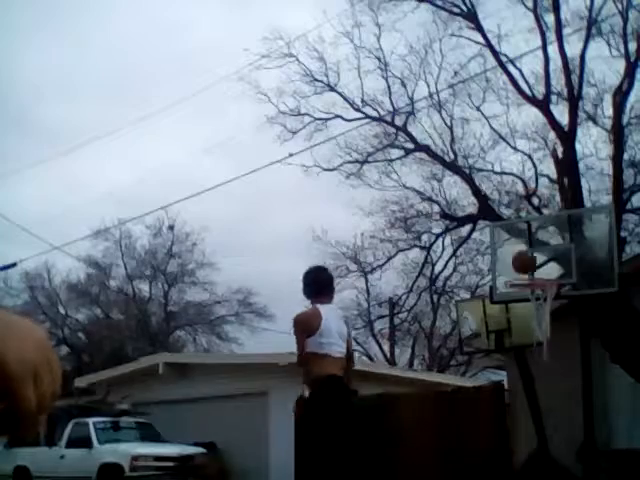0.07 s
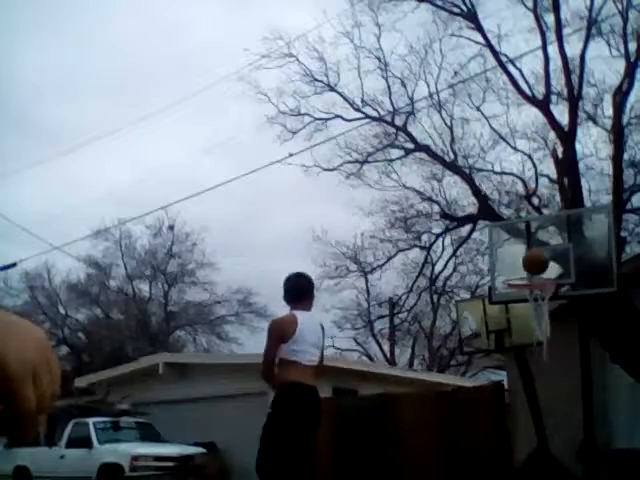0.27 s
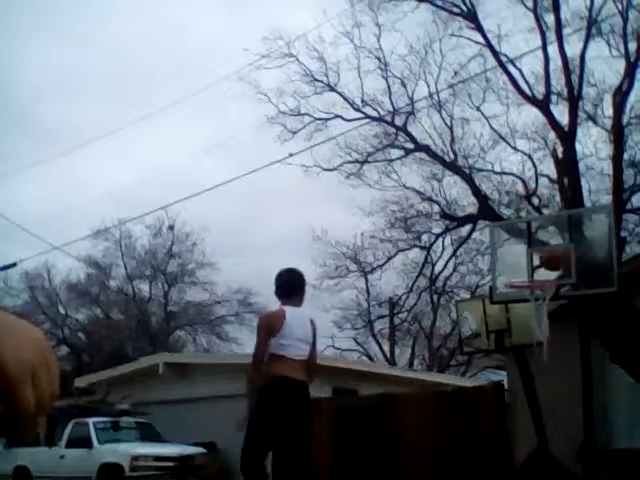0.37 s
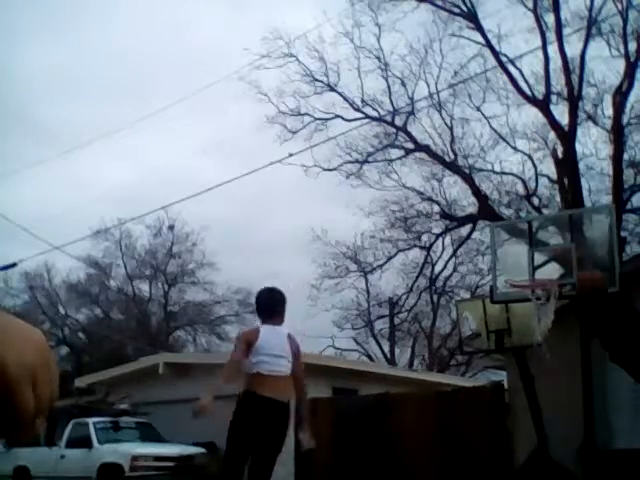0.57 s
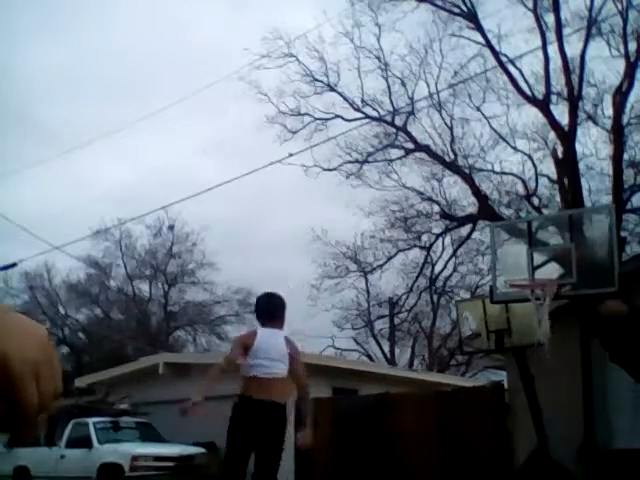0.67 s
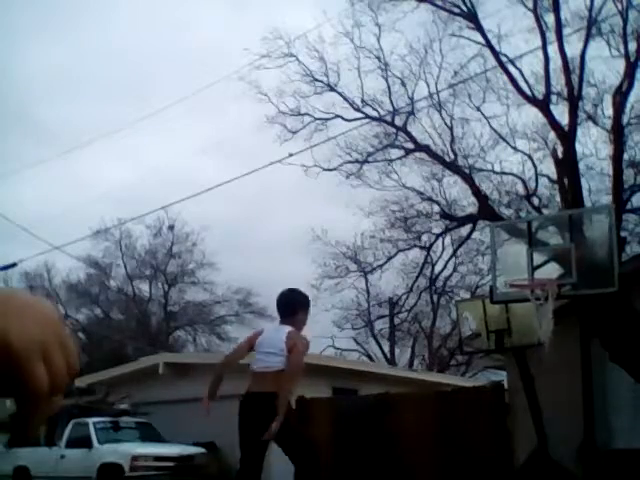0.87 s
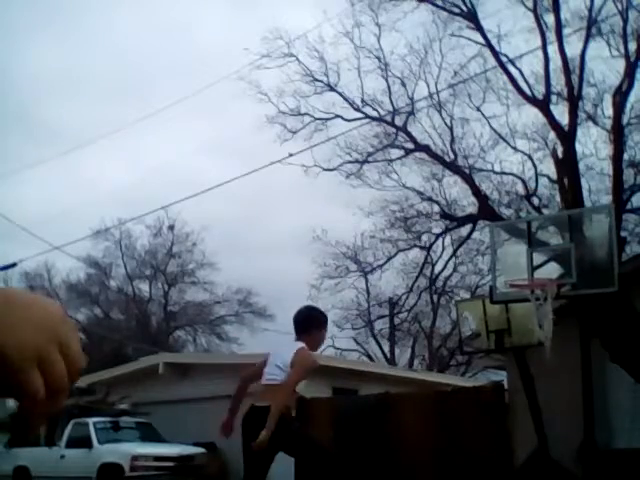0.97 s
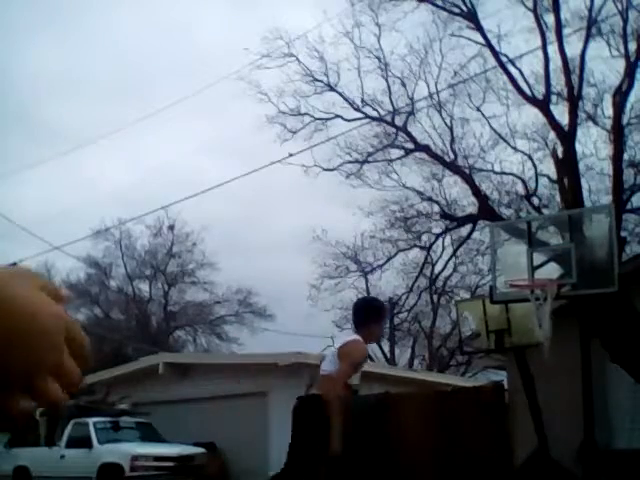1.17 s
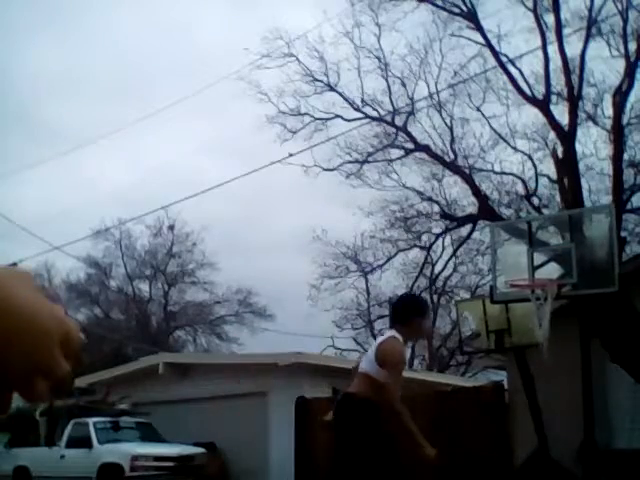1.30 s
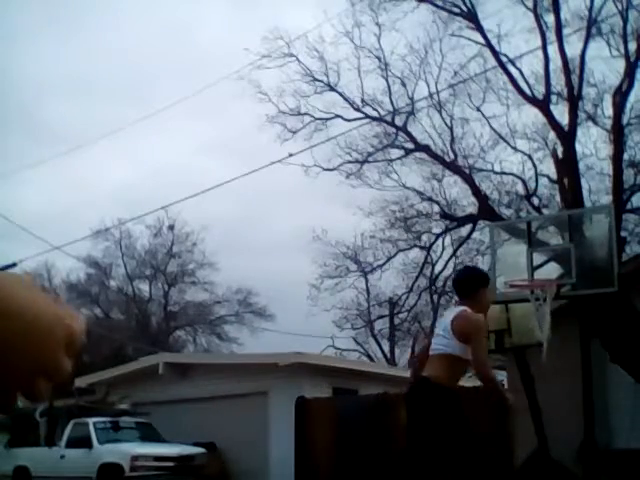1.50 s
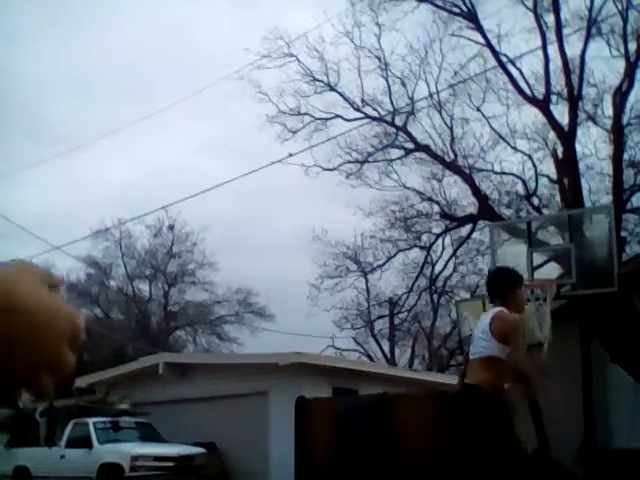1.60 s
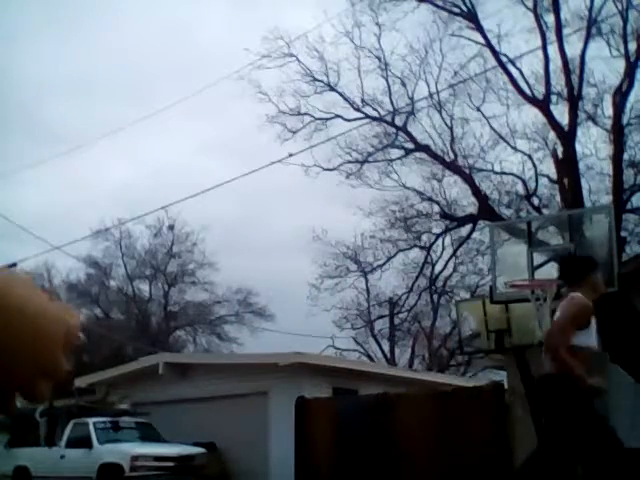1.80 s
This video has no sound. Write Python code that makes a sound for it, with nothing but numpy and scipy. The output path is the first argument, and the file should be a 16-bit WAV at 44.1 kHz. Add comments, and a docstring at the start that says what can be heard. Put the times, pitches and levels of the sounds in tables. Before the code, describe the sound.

Basketball thuds against a rattling hoop, brushes the net and slaps the driveway once.

```python
"""A backboard booms and its loose fittings rattle as a basketball hits a driveway hoop.
The ball brushes through the net, tugging the rim into a shudder, and bounces once on the
concrete: a slap, a thump of its shell and a ping of the air inside, echoed by the houses.
The player's shoes scuff and step over a quiet outdoor background."""
import sys
import numpy as np
from scipy import signal
from scipy.fft import rfft, irfft
from scipy.io import wavfile

SR = 44100
rng = np.random.default_rng(int(sys.argv[2]) if len(sys.argv) > 2 else 0)


def transcribe(signal):
    """Save signal, clipped to [-1, 1], as a 16-bit WAV file at the path in sys.argv[1]."""
    frames = np.atleast_2d(signal).T
    limited = np.clip(frames, -1, 1)
    pcm = np.round(limited * 32767).astype(np.int16)
    wavfile.write(sys.argv[1], SR, pcm)


N = 81585
T = np.arange(N) / SR


def amp(db):
    """Decibels to gain."""
    return 10 ** (np.asarray(db) / 20)


def unit_rms(x):
    """Scale to an rms of one."""
    return x / np.sqrt(np.mean(x ** 2) + 1e-20)


def lookup(points, hz):
    """Interpolate a table over log frequency."""
    table_hz, value = np.transpose(points)
    return np.interp(np.log(hz + 1), np.log(table_hz), value)


def convolve(x, y):
    """Convolution cut to scene length."""
    return signal.fftconvolve(x, y)[:N]


def colour(spectrum, size=4096):
    """Minimum-phase, unit-energy impulse response with the given spectral shape."""
    log_gain = np.log(amp(lookup(spectrum, abs(np.fft.fftfreq(size, 1 / SR)))))
    response = np.fft.ifft(np.exp(np.conj(signal.hilbert(log_gain)))).real[:size // 2]
    return response / np.linalg.norm(response)


def click(at_s):
    """Band-limited unit impulse."""
    offset = (T - at_s) * SR
    return np.sinc(offset) * np.exp(-(offset / 10) ** 2)


def envelope(start_s, db, rise_s, hold_s, t60_s):
    """Linear rise, hold, exponential release."""
    release_s = np.maximum(T - start_s - rise_s - hold_s, 0)
    return np.clip((T - start_s) / rise_s, 0, 1) * amp(db - 60 * release_s / t60_s)


def ring(modes):
    """Impulse response of damped modes."""
    return sum(envelope(0, db, 1 / SR, 0, t60) * np.sin(2 * np.pi * hz * T) for hz, db, t60 in modes)


def grains(per_s, spread_db):
    """Random tiny collisions of uneven size, unit rms."""
    size = amp(spread_db * np.minimum(rng.exponential(1, N), 4))
    return unit_rms(size * rng.choice([-1, 1], N) * (rng.random(N) < per_s / SR))


# outdoor air (frequency [Hz], relative density [dB])
AIR_SPECTRUM = [(20, -7.5), (55, -13), (85, 4), (160, -3), (260, -10), (450, -18.5), (1000, -22.5),
                (2200, -32.5), (4000, -35), (6200, -28), (7200, -33.5), (8200, -49.5), (15000, -52)]


def background(level_db=-59):
    """Distant rumble and faint hiss."""
    gain = amp(lookup(AIR_SPECTRUM, np.fft.rfftfreq(N, 1 / SR)))
    return amp(level_db) * unit_rms(irfft(rfft(rng.standard_normal(N)) * gain, N))


# sole scrapes (time [s], level [dB], rise [s], hold [s], t60 [s])
SCUFFS = [(1.096, -54, 0.0046, 0.016, 0.13), (1.803, -62, .002, 0.024, 0.16),
          (1.83, -56, 0.0017, 0.0023, 0.043)]
# grit underfoot (frequency [Hz], relative density [dB])
GRIT_SPECTRUM = [(200, 6.5), (700, -10.5), (1350, 1), (1800, -16.5), (2300, -7), (4500, -15), (6300, -6),
                 (8000, -30), (15000, -63)]
# footfall (frequency [Hz], relative density [dB])
SOLE_SPECTRUM = [(30, -10), (90, 2.5), (280, 3.5), (500, -1.5), (900, -16), (3000, -46.5)]


def shoes():
    """Soles scrape on grit; one lands with a dull pat."""
    scrape = grains(per_s=3000, spread_db=2.5) * sum(envelope(*row) for row in SCUFFS)
    pat = rng.standard_normal(N) * envelope(start_s=1.804, db=-42, rise_s=1 / SR, hold_s=0, t60_s=0.085)
    return convolve(scrape, colour(GRIT_SPECTRUM)) + convolve(pat, colour(SOLE_SPECTRUM))


# cord rubs (time [s], level [dB], rise [s], hold [s], t60 [s])
SWISHES = [(.708, -49.5, 0.012, 0.013, 0.12), (0.956, -70.5, 0.02, 0.019, .2),
           (1.515, -66, .004, .008, 0.13)]
# cord friction (frequency [Hz], relative density [dB])
CORD_SPECTRUM = [(500, 2), (2000, -5), (3500, -7), (5500, 2.5), (7000, 4.5), (8000, -15.5), (10000, -26.5),
                 (15000, -45)]


def net():
    """The ball brushes the cords, which then swing."""
    friction = grains(per_s=12000, spread_db=1.5) * sum(envelope(*row) for row in SWISHES)
    return convolve(friction, colour(CORD_SPECTRUM))


# net releasing the ball (time [s], rise [s], hold [s], t60 [s])
TUG = (.75, .035, .11, .6)
# rim hum (frequency [Hz], relative level [dB], t60 [s])
HUM_MODES = [(84, -2.5, .3), (233, 0, 0.37), (284, -5.5, 0.34), (344.8, -1.5, 0.49), (475.3, -8, 0.2)]
# rim clatter (frequency [Hz], relative density [dB])
CLATTER_SPECTRUM = [(200, 1), (500, 2), (700, -4.5), (1050, 1.5), (1450, -2), (1900, -15.5), (4000, -30.5),
                    (7000, -30.5), (9000, -40.5)]


def rim_shudder(level_db=-45.5, clatter_db=-14.5):
    """Tugged by the net, the rim hums and clatters faintly."""
    shake = grains(per_s=1500, spread_db=2.0)
    hum = unit_rms(convolve(shake, ring(HUM_MODES)))
    clatter = amp(clatter_db) * convolve(shake, colour(CLATTER_SPECTRUM))
    start_s, rise_s, hold_s, t60_s = TUG
    return envelope(start_s, level_db, rise_s, hold_s, t60_s) * (hum + clatter)


# fittings shaking (time [s], level [dB], rise [s], hold [s], t60 [s])
RATTLES = [(.227, -39.5, .001, 0.084, 0.3), (0.355, -37.5, 0.017, 0.036, 0.41),
           (0.531, -64, .02, 0.025, 0.32), (0.654, -60, 0.036, 0.11, 0.2)]
# sharp metal knocks (time [s], level [dB])
CLANKS = [(.2275, -24.5), (.2372, -33), (0.285, -32), (.358, -37.5), (0.555, -46.5), (0.799, -44.5)]
# fitting chatter (frequency [Hz], relative density [dB])
CHATTER_SPECTRUM = [(300, 3.5), (700, -1.5), (1050, 4.5), (1400, 3), (1750, -6.5), (2400, -5.5), (3000, -7),
                    (4100, -8), (5500, -6), (6800, -3), (8000, -19), (10500, -37), (15000, -55)]
# rim steel (frequency [Hz], gain [dB], t60 [s])
STEEL_MODES = [(356.3, -27, 0.25), (477.8, -28.5, .25), (1022, -34.5, 0.058), (1391, -33, .09),
               (2867, -39.5, .06), (3040, -43, .04), (3580, -45, 0.056), (5760, -39.5, 0.039),
               (6590, -60.5, .04)]


def fittings(clank_t60_s=0.011):
    """Loose steel parts knock and chatter, ringing the rim."""
    drive = grains(per_s=6000, spread_db=3) * sum(envelope(*row) for row in RATTLES)
    drive += rng.standard_normal(N) * sum(envelope(s, db, 1 / SR, 0, clank_t60_s) for s, db in CLANKS)
    return convolve(drive, colour(CHATTER_SPECTRUM)) + convolve(drive, ring(STEEL_MODES))


# nearby walls (delay [s], level [dB])
WALL_ECHOES = [(.009, -15.5), (0.0111, -7.5), (.018, -17), (0.025, -15.5), (.035, -12.5)]
# reflected sound (frequency [Hz], relative density [dB])
WALL_SPECTRUM = [(60, -2.5), (130, 0.5), (260, 7), (450, -2), (750, -2.5), (1150, 0.5), (1750, -11.5),
                 (2400, -5), (3300, -11.5), (4300, -14.5), (6600, -14), (8000, -38.5), (10500, -48),
                 (15000, -50)]


def reflections(bounce_s, wall_t60_s=0.026):
    """Walls scatter the bounce; the driveway adds a short tail, the street a faint long one."""
    walls = [(delay_s, db, wall_t60_s) for delay_s, db in WALL_ECHOES]
    driveway, street = (0.006, -7, 0.38), (0.02, -12.5, 0.97)
    scatter = np.zeros(N)
    for delay_s, db, t60_s in walls + [driveway, street]:
        tail = grains(per_s=9000, spread_db=0.5) * envelope(bounce_s + delay_s, 0, 0.0011, 0, t60_s)
        scatter += amp(db) * tail / np.linalg.norm(tail)
    return convolve(scatter, colour(WALL_SPECTRUM))


# first contact (frequency [Hz], relative density [dB])
CRACK_SPECTRUM = [(200, -26), (1000, -12.5), (1750, -12.5), (2350, 1.5), (2870, -4), (3400, -2.5),
                  (4100, -14.5), (4700, -14.5), (5900, -0.5), (7000, -9.5), (8000, -27.5), (10500, -41.5),
                  (15000, -50)]
# ball flattening (frequency [Hz], relative density [dB])
SLAP_SPECTRUM = [(100, -18.5), (300, -10.5), (570, -6.5), (960, -0.5), (1250, 7.5), (1450, -4),
                 (1750, -20.5), (2300, -6.5), (3000, -17.5), (6500, -25.5), (8000, -41), (15000, -63.5)]
# air inside the ball (frequency [Hz], gain [dB], t60 [s])
CAVITY_MODES = [(1034, -35, .28), (1244, -44, .28), (1427, -46.5, .2), (2084, -45, .22), (2347, -47.5, .18)]
# ball shell (frequency [Hz], gain [dB], t60 [s])
SHELL_MODES = [(119, -16.5, .1), (130.8, -28.5, .4), (90.4, -33.5, 0.51), (227, -23, 0.11)]


def bounce(at_s=1.236, crack_db=1, slap_db=1.5, shell_swell_s=0.0043, echo_s=0.0738, echo_db=-16.5):
    """The ball slaps concrete, its shell thumps, the air inside pings; a house returns the slap."""
    grit = rng.choice([-1, 1], N) * envelope(at_s, db=-25, rise_s=0.00035, hold_s=0.0011, t60_s=0.011)
    crack = convolve(amp(crack_db) * click(at_s) + grit, colour(CRACK_SPECTRUM))
    flatten = click(at_s + 0.0008)
    slap = amp(slap_db) * convolve(flatten, colour(SLAP_SPECTRUM))
    ping = convolve(flatten, ring(CAVITY_MODES))
    shell = ring(SHELL_MODES) * np.minimum(T / shell_swell_s, 1)
    thump = convolve(click(at_s + 0.00067), shell)
    echo = amp(echo_db) * convolve(slap + ping + amp(-19) * crack, click(echo_s))
    return crack + slap + ping + thump + echo + reflections(at_s)


# dense panel modes (frequency [Hz], relative density [dB])
FLEX_SPECTRUM = [(20, -8.5), (45, -8.5), (70, -15.5), (150, -2.5), (350, -3.5), (490, -13.5), (600, -17),
                 (900, -33.5), (2000, -75)]
# their decay (frequency [Hz], t60 [s])
FLEX_DECAY = [(30, 1), (150, 1.0), (300, 1.0), (500, 0.89), (1000, .9)]


def panel_flex(start_s, level_db=-24, rise_s=0.034):
    """The struck panel flexes in dense modes: a decaying wash of low noise."""
    wash = unit_rms(convolve(rng.standard_normal(N), colour(FLEX_SPECTRUM)))
    hz, frame_s, spectra = signal.stft(wash, SR, nperseg=2048)
    age_s = np.maximum(frame_s - start_s, 0)
    decay = amp(-60 * age_s / lookup(FLEX_DECAY, hz)[:, None])
    flex = signal.istft(spectra * decay, SR)[1][:N]
    return amp(level_db) * flex * np.clip((T - start_s) / rise_s, 0, 1)


# ball on the hoop (time [s], level [dB], contact [s])
BLOWS = [(0.2303, 1, 0.0017), (.362, -20, .002)]
# backboard, rim and pole (frequency [Hz], gain [dB], swell [s], t60 [s])
BOARD_MODES = [(45, -37, 0.019, 0.39), (85.2, -36, 0.025, 1.8), (92.8, -26, 0.0021, 1),
               (121, -36.5, .05, 2.2), (134.2, -21, 0.081, 0.49), (153.3, -24, 0.067, 1.95),
               (159.2, -31.5, 0.12, 1.7), (168.8, -17, 0.0053, 1.314), (199.1, -25, 0.11, 1.326),
               (218, -29, .004, .7), (264.2, -14.5, 0.0017, 0.37), (296.8, -33, 0.0085, .7),
               (346, -33, 0.041, 1.2), (358.3, -30.5, 0.037, 0.38), (456, -36.5, 0.0063, 0.43),
               (478, -40, 0.17, 0.29), (485, -29.5, .01, 0.76)]


def backboard(fade_from_s=0.96, fade_db_per_s=25):
    """Each blow rings the main modes, which swell in turn; the last ringing dies away faster."""
    push = np.zeros(N)
    for at_s, db, contact_s in BLOWS:
        pulse = np.sin(np.pi * np.clip((T - at_s) / contact_s, 0, 1))
        push += amp(db) * pulse / pulse.sum()
    modes = sum(envelope(0, db, swell_s, 0, t60_s) * np.sin(2 * np.pi * hz * T)
                for hz, db, swell_s, t60_s in BOARD_MODES)
    fade = amp(-fade_db_per_s * np.maximum(T - fade_from_s, 0))
    return fade * convolve(push, modes) + panel_flex(start_s=BLOWS[0][0])


def scene():
    """Hoop, net, player and ball in the open air, mono."""
    return (backboard() + fittings() + rim_shudder() + net() + shoes() + bounce() + background())[None]


def record(dry):
    """Low-pass at 15.7 kHz."""
    lowpass = signal.firwin(511, 15700, window=("kaiser", 9), fs=SR)
    return signal.oaconvolve(dry, lowpass[None], "same")


dry = scene()
out = record(dry)
transcribe(out)
```